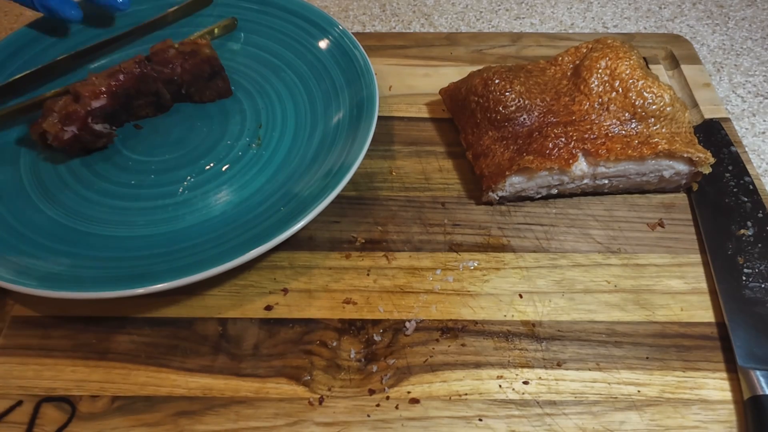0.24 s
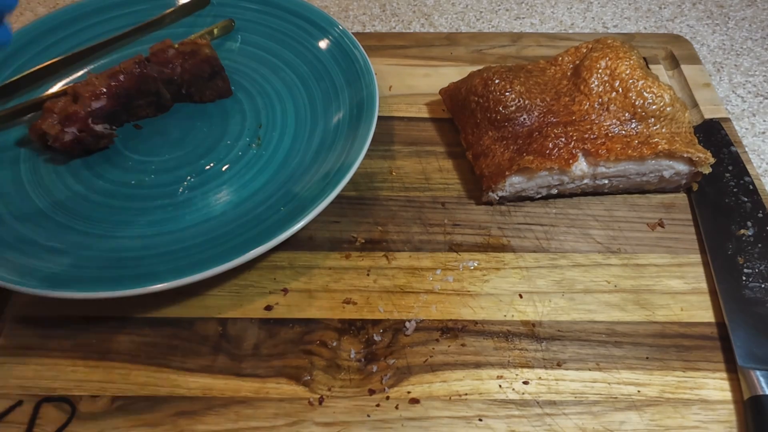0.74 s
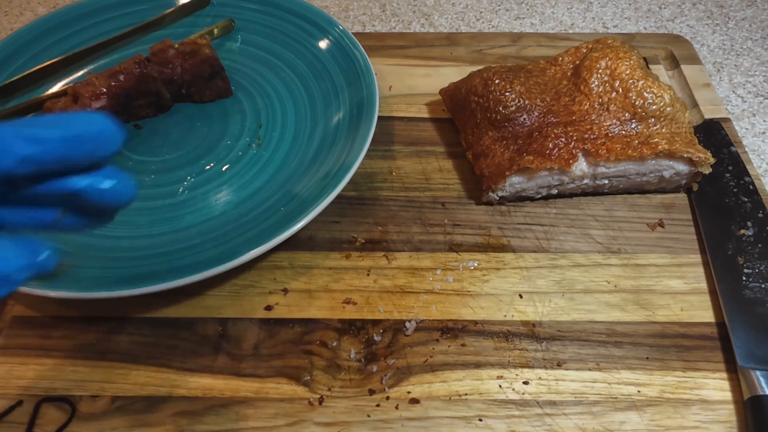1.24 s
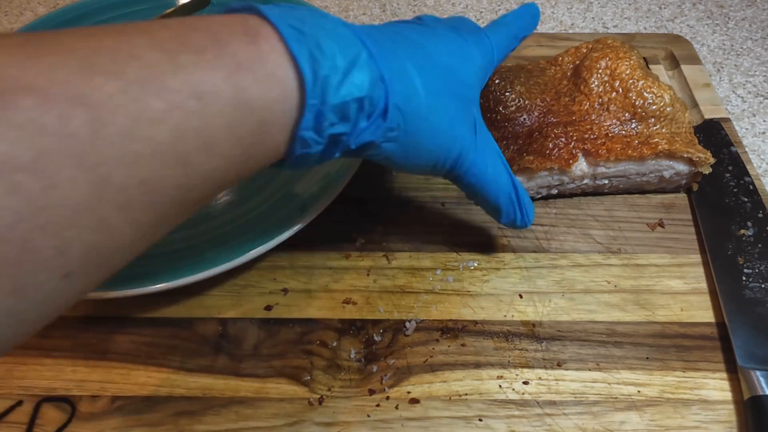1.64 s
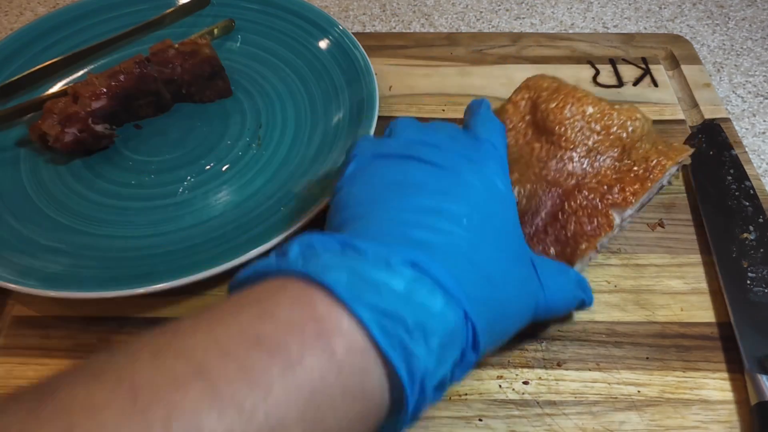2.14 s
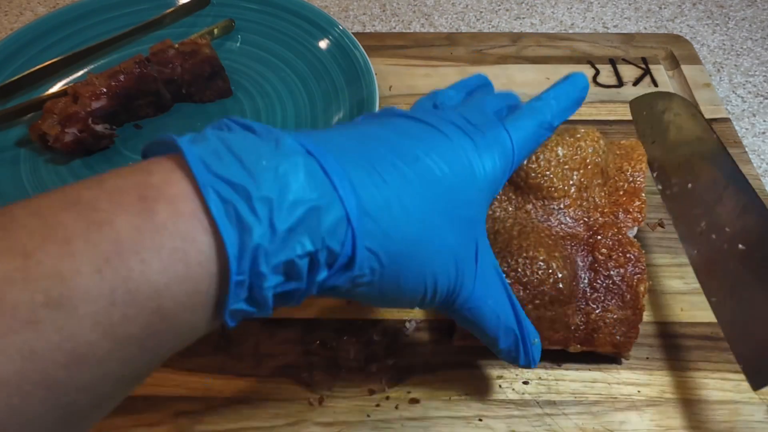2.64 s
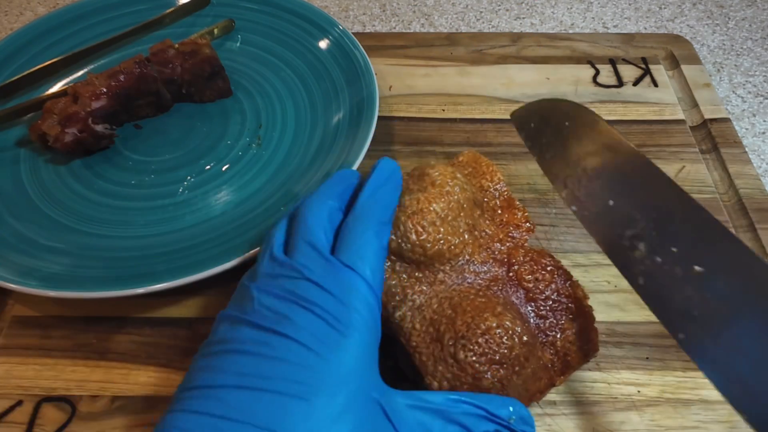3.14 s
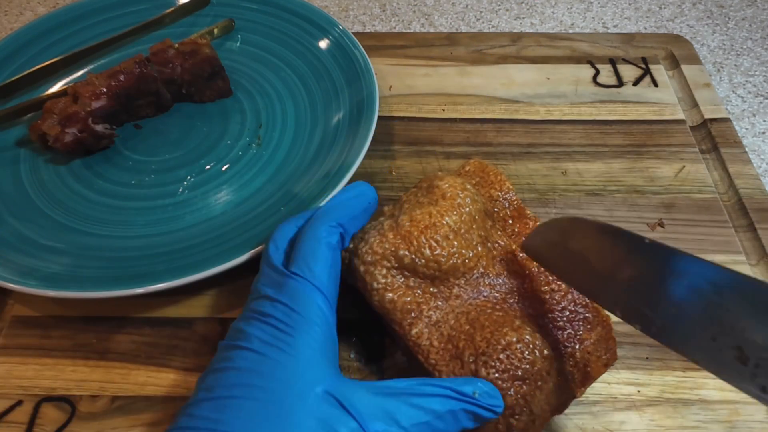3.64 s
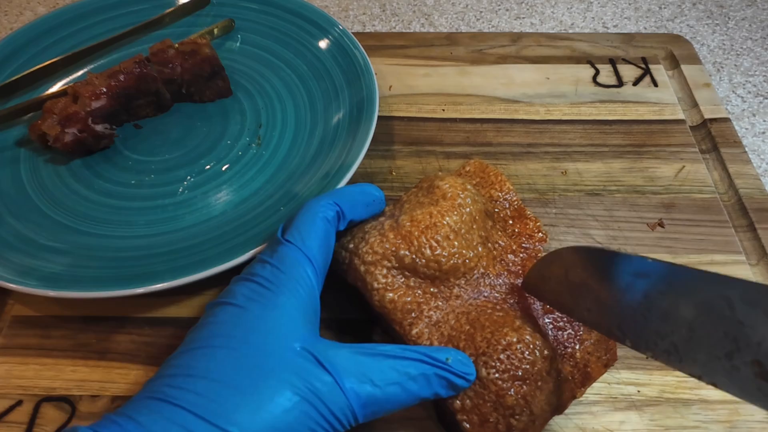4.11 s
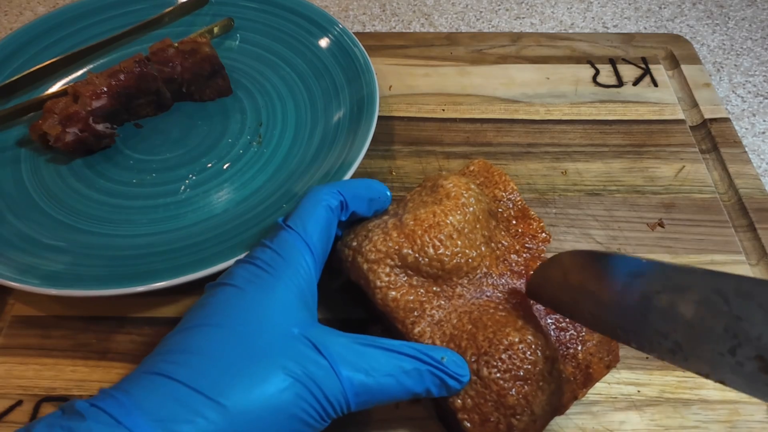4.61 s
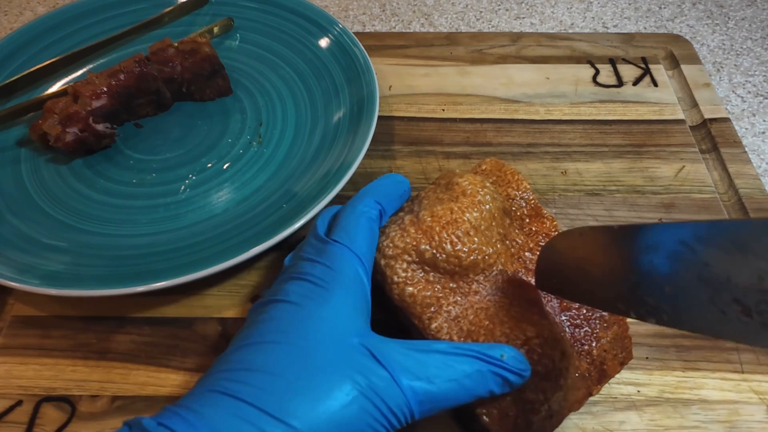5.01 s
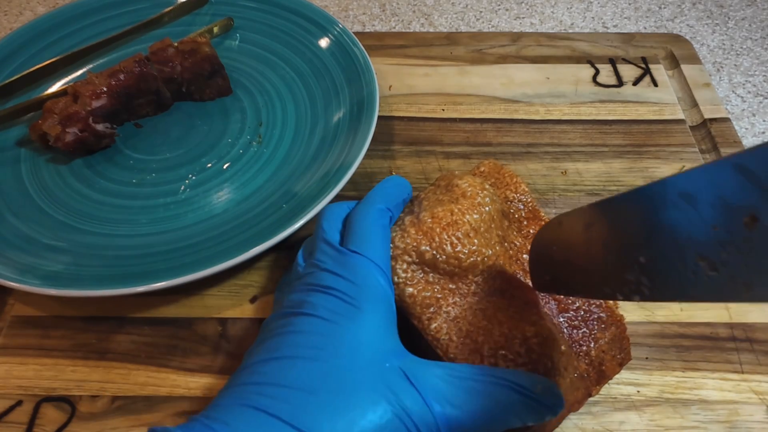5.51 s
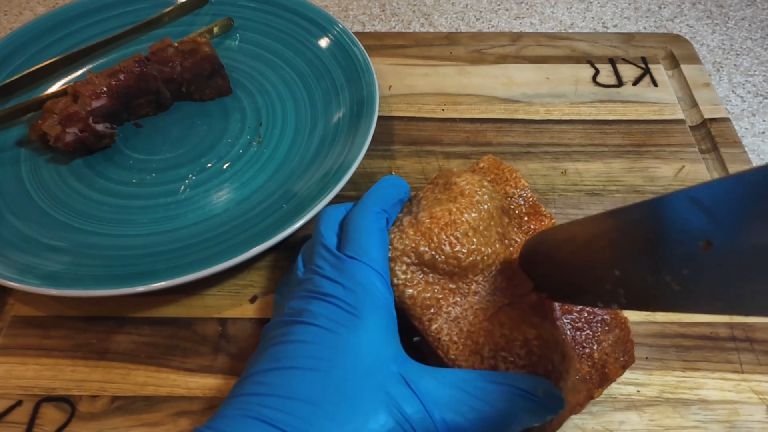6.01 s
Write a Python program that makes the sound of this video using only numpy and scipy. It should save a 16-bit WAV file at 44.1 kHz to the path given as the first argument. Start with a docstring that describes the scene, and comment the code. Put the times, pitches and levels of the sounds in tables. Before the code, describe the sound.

Close up in a small kitchen, metal tongs clatter brightly onto a ceramic plate. After near silence, a slab of crisp meat drags over a wooden board with glove rubs, a short squeak and light knife taps. The blade presses quietly, then the crust bursts in loud rapid snaps with a heavy low thud, and a few crumbs tick afterwards.

```python
"""A small kitchen, close to a pair of microphone ports: metal tongs clatter onto a ceramic plate (ringing modes).
A gloved hand drags and turns a slab of crisp roast pork on a wooden board (grainy noise, knocks, squeaks).
A big knife is picked up, set on the skin and pressed (clicks and ringing steel) until the crust bursts in a
run of snaps and the board thuds on the counter (low swelling tones). A few crumbs crack afterwards.
Quiet air and a low hum lie under it all; the room adds a diffuse tail."""
import sys
import numpy as np
from scipy import signal
from scipy.fft import rfft, irfft, next_fast_len
from scipy.io import wavfile
from scipy.ndimage import uniform_filter1d

SR = 44100
rng = np.random.default_rng(int(sys.argv[2]) if len(sys.argv) > 2 else 0)


def waveform_to_disk(signal):
    """Save audio, clipped to [-1, 1], as 16-bit WAV at the path in sys.argv[1]."""
    frames = np.transpose(np.atleast_2d(signal))
    scaled = np.clip(frames, -1, 1) * 32767
    samples = np.round(scaled).astype(np.int16)
    wavfile.write(sys.argv[1], SR, samples)


N = 276066
TIME = np.arange(N) / SR  # s


def amp(db):
    """Decibels to gain."""
    return 10 ** (np.asarray(db) / 20)


def unit(x):
    """Scales to rms 1."""
    return x / np.sqrt(np.mean(x ** 2) + 1e-20)


def read(points, hz):
    """Reads a table on a log-frequency axis."""
    f, value = np.transpose(points)
    return np.interp(np.log(hz + 1), np.log(f), value)


def add(mix, s, sound):
    """Mixes a mid/side sound in at time s."""
    part = mix[:, max(round(s * SR), 0):][:, :sound.shape[1]]
    part += sound[:, :part.shape[1]]


def colour(x, spectrum):
    """Causal (minimum-phase) filter with the given dB spectrum."""
    log_gain = np.log(amp(read(spectrum, abs(np.fft.fftfreq(4096, 1 / SR)))))
    response = np.exp(np.conj(signal.hilbert(log_gain)))
    taps = np.fft.ifft(response).real[:2048]
    return signal.oaconvolve(x, taps[None], axes=1)[:, :x.shape[1]]


def burst(gain_at, t60, size=22050):
    """Dense, dying vibration: noise shaped by a spectrum, falling 60 dB in t60 seconds."""
    spectrum = rfft(rng.standard_normal((2, size))) * gain_at(np.fft.rfftfreq(size, 1 / SR))
    return unit(irfft(spectrum)) * amp(-60 * TIME[:size] / t60)


def ring(hz, db, t60, size=22050):
    """Dying modes; bending waves bring the high ones first, and alternate modes lean to opposite sides."""
    arrival = .001 * np.sqrt(2000 / hz[:, None])
    t = np.maximum(TIME[:size] - arrival, 0)
    onset = 1 - np.exp(-(t * hz[:, None]) ** 2)  # each builds over about one cycle
    decay = amp(db[:, None] - 60 * t / t60[:, None])
    modes = onset * decay * np.sin(2 * np.pi * hz[:, None] * t)
    return np.array([modes.sum(0), (-1) ** np.arange(len(hz)) @ modes])


def grains(spectrum, per_s, spread_db, smooth):
    """Tiny slips and fractures of uneven size over a smooth rubbing noise."""
    sizes = amp(spread_db * np.minimum(rng.exponential(1, N), 4))
    sizes = sizes * (rng.random(N) < per_s / SR)
    clicks = unit(sizes * rng.choice([-1., 1.], (2, N)))
    return unit(colour(clicks + smooth * rng.standard_normal((2, N)), spectrum))


STROKE_DROP_DB = 21.5  # a stroke is this far down at the ends of its rise and fall
STROKE_CURVE = 1.6  # above 1 rounds its top


def swells(rows):
    """Gain over time of strokes that each rise to a peak and fall away; overlaps add as power."""
    power = np.zeros(N)
    for peak, rise, fall, db in rows:
        away = np.maximum((peak - TIME) / rise, (TIME - peak) / fall)
        drop_db = STROKE_DROP_DB * np.minimum(abs(away), 4) ** STROKE_CURVE
        power += amp(db - drop_db) ** 2
    return np.sqrt(power)


# colour of the still air: f/Hz, relative level/dB
AIR = [(25, 5.5), (45, 3.5), (100, -9), (220, -11), (400, -20.5), (1000, -28.5), (3000, -28), (6000, -38.5),
       (13000, -38), (16000, -45)]
AIR_DB = -61  # rms of the mid signal
# swells of the low hum: peak t/s, rise/s, fall/s, level/dB
HUM = [(4.47, 0.33, 0.31, -63), (4.96, 0.21, .14, -55.5), (5.18, 0.22, 0.164, -61.5)]
HUM_HZ = 199


def background(side_db=3, hum_side=0.64):
    """Still kitchen air as coloured noise, and a low hum as a swelling sine."""
    air = amp(AIR_DB) * unit(colour(rng.standard_normal((2, N)), AIR))
    hum = swells(HUM) * np.sqrt(2) * np.sin(2 * np.pi * HUM_HZ * TIME)
    return air * amp([[0], [side_db]]) + hum * np.array([[1], [hum_side]])


# modes of the tongs against the plate: f/Hz
PLATE_HZ = [754, 840, 905, 1217, 1340, 1378, 1475, 1939, 2003, 2213, 2301, 2770, 2880, 2929, 3485, 3683,
            3740, 3864, 4562, 4740, 5140, 5867, 6045, 7149, 7833, 8538, 8694, 9999, 10350, 11636, 11950,
            12550, 13350, 13850]
# the same modes in order: level struck at the rim/dB, level struck in the dish/dB, t60/s
PLATE = [(-47.5, -27, .18), (-52, -29, 0.21), (-49, -35.5, 0.014), (-36.5, -31, 0.27),
         (-24.5, -24.5, 0.068), (-39, -20.5, 0.14), (-41.5, -37.5, .15), (-21, -19, 0.085),
         (-25.5, -16.5, 0.02), (-22, -25, 0.26), (-35, -21.5, 0.19), (-13, -14, 0.071),
         (-24.5, -16.5, 0.12), (-18.5, -29, 0.023), (-24, -27.5, 0.14), (-7, -20.5, 0.13), (-26, -22, 0.22),
         (-27, -27, 0.095), (-17.5, -20, 0.043), (-16, -16, 0.11), (-23.5, -31.5, 0.099),
         (-16.5, -34, 0.21), (-29.5, -26.5, 0.075), (-25, -26.5, 0.075), (-11.5, -37, 0.086),
         (-38.5, -26.5, 0.039), (-24, -42, .08), (-19, -26.5, 0.042), (-23.5, -35, .07),
         (-17.5, -39.5, 0.059), (-22.5, -36.5, .07), (-24, -41.5, 0.077), (-26.5, -40, .06),
         (-27, -39.5, .06)]
# blows of the tongs: t/s, level/dB, place from rim 0 to dish 1
CLINKS = [(0.0, -14.5, 0.81), (.011, -25.5, 0.88), (0.1355, -3.5, 0.23), (.1525, -1, 0.17), (.2785, 1.5, 1),
          (0.286, -4, 1), (.2995, -11, 0.52), (.311, -13, 1)]
# broad clatter of a blow: f/Hz, relative level/dB
CLATTER = [(60, -31), (120, -19), (200, -1), (400, -14.5), (800, -9.5), (1400, -7.5), (2800, 1.5),
           (4800, -4), (5500, -29), (9000, -30), (13500, -25.5), (16000, -41)]
TONGS_HZ, TONGS_DB = 1206, -48  # the open tongs sing until they touch down
TOUCH_DOWN_S = .136


def plate(buzz_db=-9, buzz_hz=80, buzz_t60=0.18, clatter_db=-22, clatter_t60=0.072, dish_db=14,
          free_db=-26, free_t60=0.46, free_slope=0.25, free_top_hz=11500):
    """Each blow rings the modes; the chattering contact smears them and adds a broad clatter."""
    out = np.zeros((2, N))
    hz, (rim, dish, t60) = np.array(PLATE_HZ), np.transpose(PLATE)
    # undamped decay: free_t60 seconds near 3 kHz, shorter towards the treble
    long_t60 = free_t60 * (3000 / hz) ** free_slope / (1 + (hz / free_top_hz) ** 4)
    for s, db, place in CLINKS:
        mode_db = rim + place * (dish - rim)

        def skirts(f):
            peaks = amp(mode_db[:, None]) ** 2 / (1 + ((f - hz[:, None]) / buzz_hz) ** 2) ** 2
            return np.sqrt(peaks.sum(0))

        def body(f):
            # a blow in the dish also pushes the board under it: more bass
            return amp(read(CLATTER, f) + dish_db * (place - 1) / (1 + (f / 1500) ** 2))

        add(out, s, amp(db) * ring(hz, mode_db, t60))
        # a faint ring, free of the tongs' damping, lasts longer
        add(out, s, amp(db + free_db) * ring(hz, mode_db, long_t60))
        mode_sum = np.linalg.norm(amp(mode_db))
        add(out, s, amp(db + buzz_db) * mode_sum * burst(skirts, buzz_t60))
        add(out, s, amp(db + clatter_db) * burst(body, clatter_t60))
    damping = np.exp(-np.maximum(TIME - TOUCH_DOWN_S, 0) / 0.096)
    return out + amp(TONGS_DB) * np.sin(2 * np.pi * TONGS_HZ * TIME) * damping


# soft blows of plate, meat and knife on the board: t/s, level/dB, centre f/Hz, t60/s
KNOCKS = [(0.0, -57, 194, 0.33), (0.133, -40.5, 158, 0.33), (0.281, -32.5, 379, .16), (0.282, -36, 170, .2),
          (.785, -54.5, 1695, 0.11), (1.864, -38, 1310, 0.082), (2.314, -32.5, 180, 0.13),
          (2.771, -45, 280, 0.5), (2.826, -41.5, 230.8, 0.43), (3.179, -43.5, 244, 0.039),
          (3.879, -38.5, 437, 0.078), (3.9009, -19.5, 371.2, 0.04), (4.542, -40.5, 480, 0.073),
          (4.55, -32.5, 420, 0.091), (4.613, -41.5, 554, 0.068), (4.765, -49.5, 454, 0.11),
          (5.46, -53, 444.5, 0.051), (5.728, -15.5, 261, 0.05), (5.79, -26.5, 104.2, .2),
          (5.827, -30.5, 300, 0.27)]


def knocks(sharpness=2.8):
    """Heavily damped blows on the wood, each around one broad resonance."""
    out = np.zeros((2, N))
    for s, db, hz, t60 in KNOCKS:
        blow = burst(lambda f: 1 / (1 + (sharpness * (f / hz - hz / (f + 1)) / 2) ** 2), t60)
        onset = 1 - np.exp(-TIME[:blow.shape[1]] / 0.0028)
        add(out, s, amp(db) * blow * onset)
    return out


# the board rocks on the counter: t/s, level/dB, f/Hz, swell to the peak/s, side over mid gain before WIDTH
THUDS = [(.29, -42, 44.98, .022, 1.8), (1.975, -38.5, 43.45, .033, 1.8), (2.378, -37.5, 40.56, .037, 1.8),
         (2.609, -41.5, 39, .04, 1.8), (2.856, -38, 43, .025, 1.8), (3.927, -37.5, 45, .021, 1.8),
         (4.588, -44, 42.85, .032, 1.8), (5.29, -46.5, 50, .035, 1.8), (5.412, -34, 41, .035, 1.8),
         (5.752, -14, 42.2, .05, .45), (5.819, -9.5, 60.8, .018, .3), (5.89, -29, 58.5, .04, .45)]


def thuds(side_lag=.9):
    """The board's low rocking swells and dies away; its side signal lags by some radians."""
    out, t = np.zeros((2, N)), TIME[:SR // 2]
    for s, db, hz, swell, side in THUDS:
        shape = (t / swell) ** 2 * np.exp(2 * (1 - t / swell))
        turn = 2 * np.pi * hz * t
        add(out, s, amp(db) * shape * np.array([np.sin(turn), side * np.sin(turn - side_lag)]))
    return out


def rasp(x, patch_db=3, clump_db=2):
    """The contact keeps shifting: resonances come and go, and the slips bunch together."""
    z = signal.stft(x, nperseg=256)[2]
    patches = uniform_filter1d(rng.standard_normal(z.shape[1:]), size=3, axis=0)  # over frequency
    patches = unit(uniform_filter1d(patches, size=12, axis=1))  # over time
    clumps = unit(uniform_filter1d(rng.standard_normal(z.shape[2]), size=3))
    gain = unit(amp(patch_db * patches + clump_db * clumps))
    return signal.istft(z * gain, nperseg=256)[1][:, :N]


# the meat slides over the wood: peak t/s, rise/s, fall/s, level/dB
DRAGS = [(.85, .2, 0.36, -72), (1.2, .15, 0.19, -66.5), (1.95, .14, 0.18, -53.5), (2.185, 0.072, .1, -44),
         (2.275, .11, 0.11, -37.5), (2.82, 0.13, .22, -38), (3.09, 0.29, 0.18, -54.5),
         (3.49, 0.12, 0.11, -53.5), (3.8, 0.16, .14, -57.5), (4.0, 0.11, 0.5, -69),
         (4.66, 0.21, .35, -64.5), (5.31, .08, .1, -64), (5.43, 0.097, 0.12, -66.5),
         (5.87, 0.15, 0.22, -41.5)]
# its colour: f/Hz, relative level/dB
DRAG = [(80, -8.5), (200, -7.5), (450, -8), (900, 0), (1600, 0), (2600, -6), (4000, -5), (8000, -30.5)]
# the glove rubs on the meat: peak t/s, rise/s, fall/s, level/dB
RUBS = [(.83, 0.082, 0.32, -68), (1.17, 0.091, 0.21, -58), (1.43, 0.063, 0.095, -68),
        (1.94, 0.18, 0.19, -58.5), (2.25, 0.12, .16, -50.5), (2.6, 0.23, 0.064, -57.5),
        (2.87, 0.3, 0.19, -50.5), (3.09, 0.12, 0.18, -50), (3.5, .14, 0.11, -55), (3.66, 0.077, 0.077, -54),
        (3.8, .1, 0.4, -59.5), (4.95, 0.42, 0.17, -60.5), (5.31, 0.074, 0.11, -54)]
# its colour: f/Hz, relative level/dB
GLOVE = [(800, -38), (2200, -7.5), (3800, -2), (5500, -4), (8000, -11.5), (14000, -11.5)]
# glove and blade scrape the dry skin: peak t/s, rise/s, fall/s, level/dB
SCRAPES = [(.92, 0.21, 0.19, -66.5), (1.2, 0.17, .17, -69), (2.25, 0.066, 0.15, -59.5),
           (2.84, 0.16, 0.061, -42), (3.07, 0.11, 0.2, -57), (3.285, 0.034, 0.25, -61),
           (3.5, 0.084, 0.25, -56), (3.65, 0.12, 0.17, -53.5), (4.1, 0.36, 0.21, -59),
           (4.96, .2, .12, -55.5), (5.263, 0.015, 0.075, -48), (5.42, 0.2, 0.25, -63.5)]
# its colour: f/Hz, relative level/dB
SKIN = [(2500, -29), (6500, -14.5), (9000, 2.5), (11500, 2), (13300, 8), (14500, -17), (16000, 1)]


def handling():
    """Meat drags over the wood, the glove rubs and the dry skin crackles: swelling streams of tiny slips."""
    def slips(spectrum):
        return grains(spectrum, per_s=1100, spread_db=2.6, smooth=.5)

    dragging = swells(DRAGS) * slips(DRAG)
    rubbing = swells(RUBS) * slips(GLOVE)
    scraping = swells(SCRAPES) * slips(SKIN)
    return rasp(dragging + rubbing + scraping)


# rubbery squeaks, one table each: t/s, f/Hz, level/dB, octave above relative to it/dB
SQUEAKS = [
    [(2.46, 466, -61, -22), (2.51, 485, -50.5, -13), (2.56, 570, -45.5, -25), (2.6, 591, -42, -18),
     (2.63, 536.6, -49.5, -7)],
    [(5.085, 3650, -69.5, -23), (5.11, 3000, -70.5, -3), (5.145, 2300, -74, -3.5)],
]


def squeaks(width_hz=160):
    """Stick and slip: a fuzzy resonance that glides, with a weaker octave."""
    out, r = np.zeros((2, N)), np.exp(-np.pi * width_hz / SR)
    for rows in SQUEAKS:
        s, *columns = np.transpose(rows)
        t = np.arange(s[0], s[-1], 1 / SR)
        hz, db, octave_db = (np.interp(t, s, column) for column in columns)
        noise = rng.standard_normal((2, SR)) + 1j * rng.standard_normal((2, SR))
        fuzz = signal.lfilter([1], [1, -2 * r, r * r], noise)[:, :len(t)]
        turn = np.exp(2j * np.pi * np.cumsum(hz) / SR)
        tone = turn + amp(octave_db) * turn ** 2
        add(out, s[0], amp(db) * unit((fuzz * tone).real))
    return out


# colour of the crust: f/Hz, relative level/dB
CRUST = [(80, -9), (250, 3), (600, 3), (1200, 3.5), (1700, 3.5), (2300, 2.5), (3300, 3.5), (4500, -4.5),
         (7000, -11), (10000, -10), (13500, -17.5), (15000, -15), (16000, -19.5)]


def snap(t60, tilt_db):
    """A short crack with the colour of the crust, tilted by dB per octave above 800 Hz."""
    def tilted(f):
        return amp(read(CRUST, f) + tilt_db * np.log2(np.maximum(f, 800) / 800))

    return burst(tilted, t60)


# modes of the knife blade: f/Hz, relative level/dB, t60/s
BLADE = [(2456, 2.5, 0.094), (2853, 3.5, 0.089), (4810, -3.5, 0.11), (5910, -8.5, 0.12),
         (6756, -8.5, 0.095), (7990, 2, 0.055), (8600, -7, 0.16), (10040, 4, 0.067), (12500, 5, 0.059),
         (13460, -7.5, 0.12)]
# the knife taps the board or the meat: t/s, level/dB, how freely the blade rings 0-1
TAPS = [(2.5342, -39.5, 0.82), (2.609, -26.5, 0.75), (2.7688, -27.5, 0.3), (2.8245, -32, 0.7),
        (2.844, -31, 0.3), (2.935, -39, 0.84), (3.7924, -42, 0.63), (3.904, -27, 0.12), (4.2858, -49, 0.16),
        (4.382, -55.5, 0.05), (4.5529, -39.5, 0), (4.6407, -48, 0.13), (5.0255, -50, 0.06),
        (5.309, -47.5, .2), (5.4136, -50, 0), (5.466, -49.5, 0.3), (5.6235, -56, 0.4)]
TAP_T60 = .028  # s
TAP_TILT_DB, HARD_TILT_DB = -2, 5  # dB per octave on soft meat; extra dB per octave when the blade is free


def knife(ring_db=-10, held_db=-6, held_hz=2800, held_width_hz=450, held_t60=0.049):
    """A tap is a click and a clack of the held blade; off the meat it is brighter and the steel rings."""
    out, steel = np.zeros((2, N)), ring(*np.transpose(BLADE))
    for s, db, free in TAPS:
        click = snap(TAP_T60, TAP_TILT_DB + free * HARD_TILT_DB)
        clack = burst(lambda f: 1 / (1 + ((f - held_hz) / held_width_hz) ** 2), held_t60)
        add(out, s, amp(db) * (click + amp(held_db) * clack + free * amp(ring_db) * steel))
    return out


# the crust cracks under the blade: t/s, level/dB, t60/s
CRACKS = [(3.614, -45.5, 0.011), (5.258, -46.5, 0.0057), (5.32, -40.5, 0.0078), (5.5246, -51, 0.0109),
          (5.7285, -8, 0.013), (5.7325, -18, 0.0089), (5.7419, -13, .012), (5.7463, -6, 0.0079),
          (5.762, -9, .011), (5.7666, -14.5, .026), (5.8034, -14.5, .035), (5.9684, -30, 0.0126),
          (6.0269, -24, .013), (6.0484, -29, .008), (6.06, -38.5, 0.027), (6.1248, -47.5, 0.0155),
          (6.1348, -40, 0.0162), (6.2033, -44, 0.0101)]
CRACK_TILT_DB = 5  # dB per octave
# colour of the ticking crumbs: f/Hz, relative level/dB
CRUMBS = [(1000, -14.5), (3500, 0), (8000, -1), (13500, -3), (15500, -21.5)]


def crust(ring_db=-24, shed_db=-17, shed_t60=.13, crumbs_db=-30, crumbs_t60=0.38):
    """Each crack jolts the blade, sets off a rush of small fractures and leaves sparse crumbs ticking."""
    out, steel = np.zeros((2, N)), ring(*np.transpose(BLADE))
    power = np.zeros((2, N))  # rows: fractures, crumbs
    start_db, t60s = np.array([[shed_db], [crumbs_db]]), np.array([[shed_t60], [crumbs_t60]])
    dying = amp(start_db - 60 * TIME[:SR] / t60s)
    for s, db, t60 in CRACKS:
        add(out, s, amp(db) * (snap(t60, CRACK_TILT_DB) + amp(ring_db) * steel))
        add(power, s, (amp(db) * dying) ** 2)
    shedding, crumbling = np.sqrt(power)
    fractures = grains(CRUST, per_s=900, spread_db=5.5, smooth=.15)
    crumbs = grains(CRUMBS, per_s=260, spread_db=4, smooth=.2)
    return out + shedding * fractures + crumbling * crumbs


# decay of the kitchen: f/Hz, t60/s
ROOM = [(100, .3), (300, 0.54), (800, 0.81), (2500, 0.61), (6000, 0.52), (10000, .38), (15000, 1)]


def kitchen(x, build_s=0.0066):
    """A diffuse tail that builds quickly; each band dies at its own speed."""
    hz, t, z = signal.stft(rng.standard_normal((2, SR * 3 // 4)), SR, nperseg=256)
    tail = signal.istft(z * amp(-60 * t / read(ROOM, hz)[:, None]), SR, nperseg=256)[1]
    tail *= 1 - np.exp(-(TIME[:tail.shape[1]] / build_s) ** 2)
    return signal.fftconvolve(x, tail / np.linalg.norm(tail[0]), axes=1)[:, :N]


def aim(x, lead):
    """A source off to one side reaches one port first: part of its side signal is the mid in quadrature."""
    lead = np.clip(lead, -1, 1)
    quadrature = -signal.hilbert(x[0], next_fast_len(N))[:N].imag
    return np.array([x[0], lead * quadrature + np.sqrt(1 - lead ** 2) * x[1]])


# stereo width at the microphone ports: f/Hz, gain on the side signal/dB
WIDTH = [(40, 2.5), (150, -8.5), (400, -14), (1500, -22.5), (2800, -17.5), (5000, -8), (8000, -5),
         (14000, 0)]


def scene(plate_room_db=-16, board_room_db=-15, pan_db=-0.1):
    """Sources and room as mid and side; the channels differ most in the lowest bass and the treble."""
    clinks = plate()
    cutting = crust() + knife() + knocks() + handling() + squeaks()
    room = kitchen(amp(plate_room_db) * clinks + amp(board_room_db) * cutting)
    direct = aim(clinks, lead=1.0) + aim(cutting, lead=-0.73)
    mid, side = direct + room + thuds() + background()
    size = next_fast_len(N)
    width = amp(read(WIDTH, np.fft.rfftfreq(size, 1 / SR)))
    side = irfft(rfft(side, size) * width, size)[:N]
    return np.array([mid + side, mid - side]) * amp([[pan_db / 2], [-pan_db / 2]])


EDGE_HZ = 16000  # top of the sound's band


def record(dry):
    """Peaks round off near full scale; then the band limit."""
    rounded = dry / (1 + dry ** 6) ** (1 / 6)
    low_pass = signal.firwin(511, EDGE_HZ, window=("kaiser", 9), fs=SR)
    return signal.oaconvolve(rounded, low_pass[None], "same")


dry = scene()
out = record(dry)
waveform_to_disk(out)
```